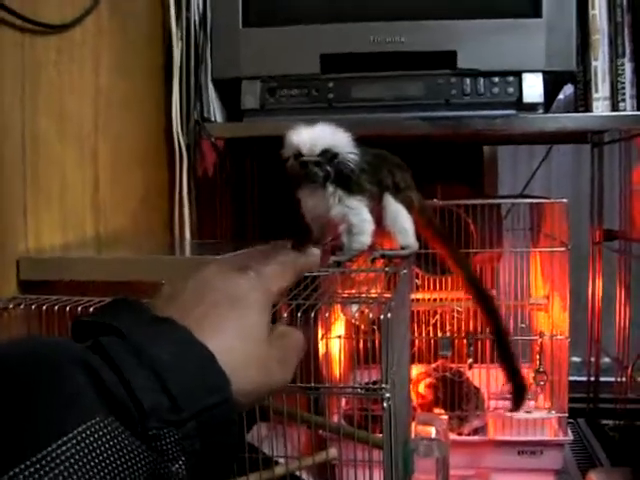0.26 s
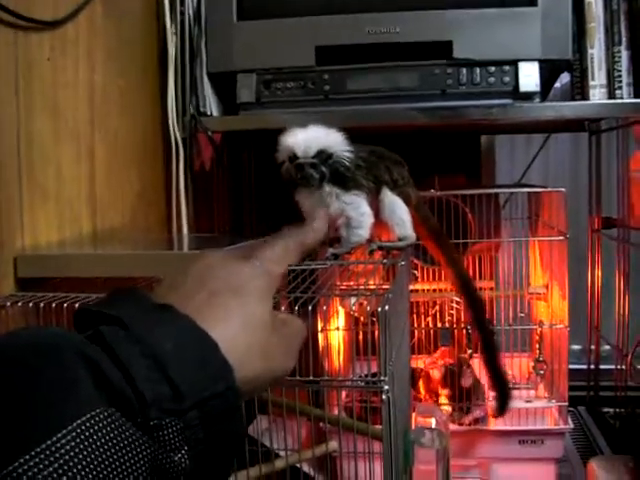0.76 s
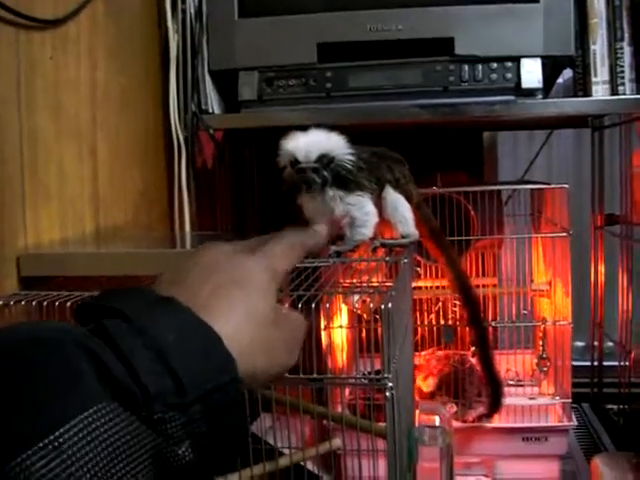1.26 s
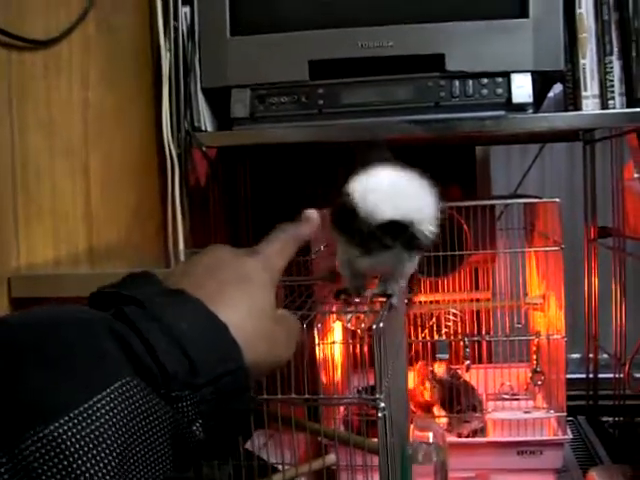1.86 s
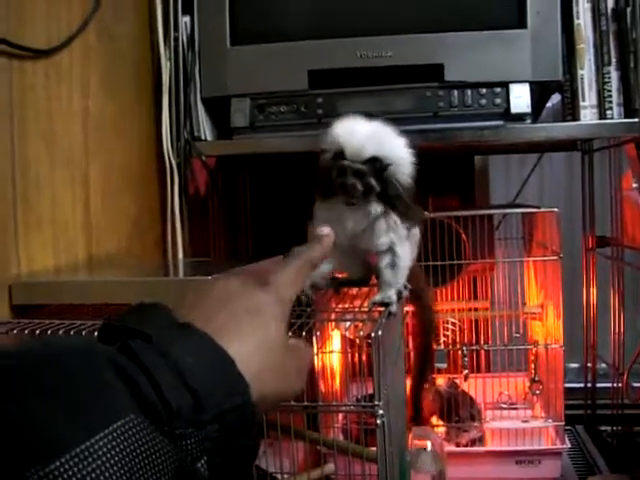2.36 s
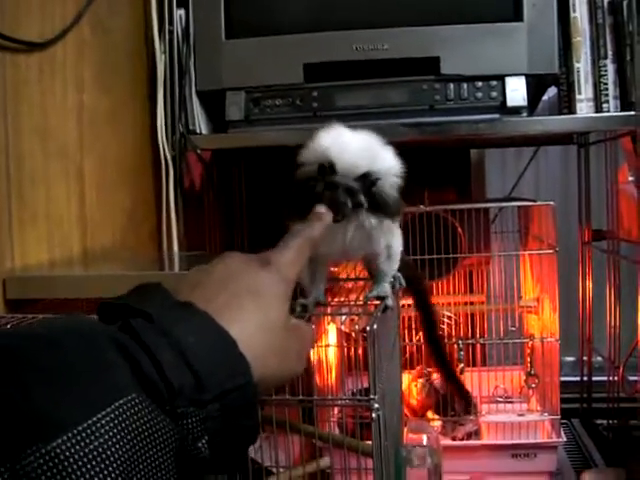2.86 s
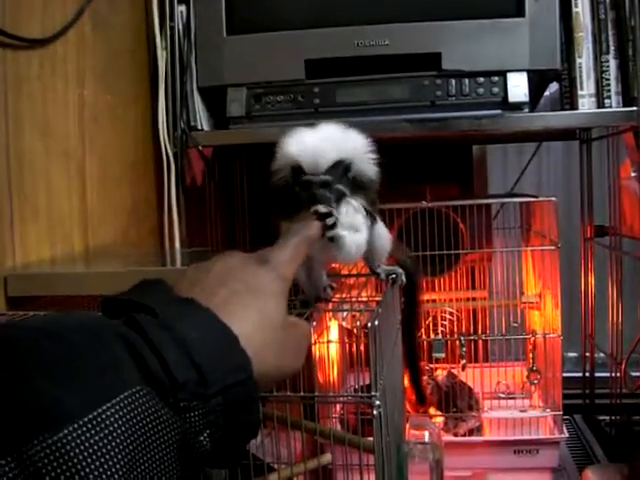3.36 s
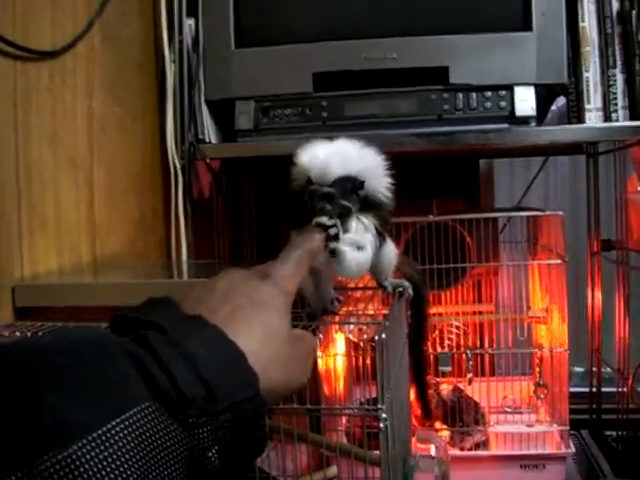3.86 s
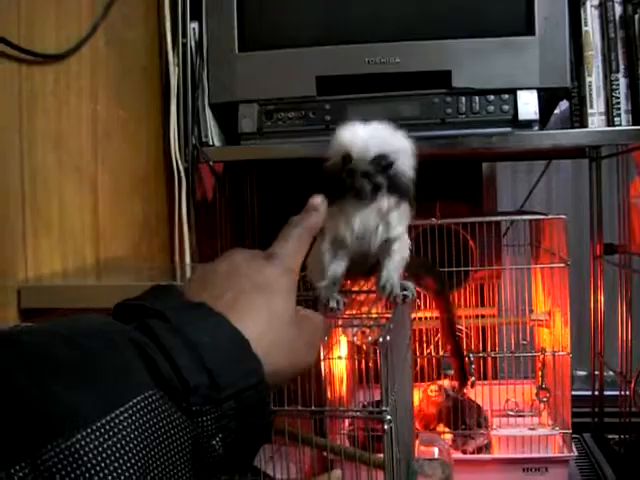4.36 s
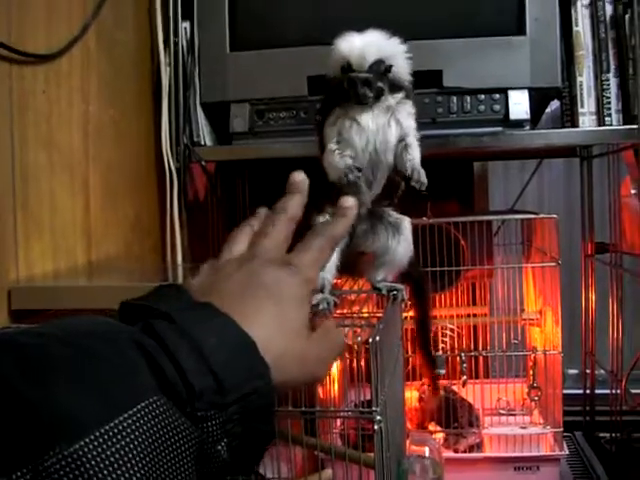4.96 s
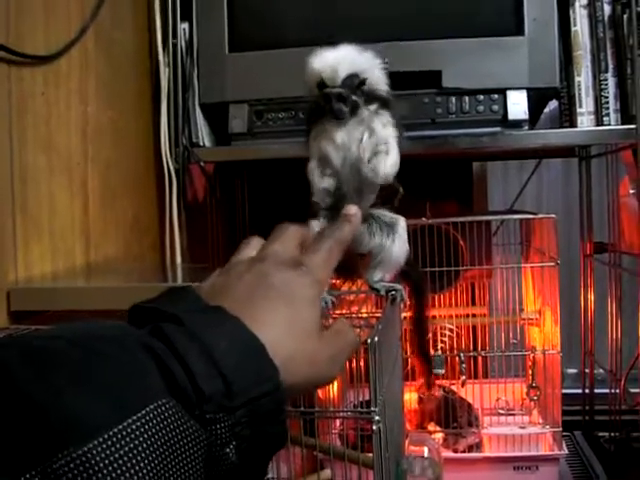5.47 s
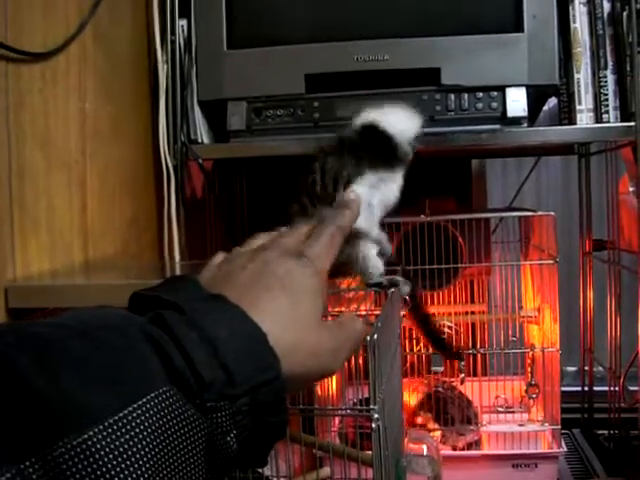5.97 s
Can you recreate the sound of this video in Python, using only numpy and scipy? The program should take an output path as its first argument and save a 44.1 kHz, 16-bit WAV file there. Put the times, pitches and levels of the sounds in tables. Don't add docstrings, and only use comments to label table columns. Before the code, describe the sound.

A small monkey whistles shrilly for a second, later gives five tiny falling chirps and one swooping whistle, over a low indoor motor hum.

```python
import sys
import numpy as np
from scipy import signal
from scipy.fft import rfft, irfft, next_fast_len
from scipy.io import wavfile
from scipy.ndimage import uniform_filter1d

SR = 44100
rng = np.random.default_rng(int(sys.argv[2]) if len(sys.argv) > 2 else 0)


def voltage_ratio(decibels):
    exponent = np.asarray(decibels, float) / 20
    return 10 ** exponent


def transcribe(u):
    v = np.clip(np.atleast_2d(u).T, -1, 1)
    q = np.round(v * 32767).astype(np.int16)
    wavfile.write(sys.argv[1], SR, q)


N = 273420

# hz, level_db (per Hz)
BREATH = [(1500, -4), (4000, -4.5), (7000, -6.5), (11000, -2.5), (16000, -2.5)]


def monkey():
    shared = coloured(BREATH)
    breath = shared + 1.4 * np.array([coloured(BREATH), coloured(BREATH)])
    return whistles(breath) + chirps(breath)


# start_s, pitch_hz, fundamental_db, overtones_db (against it), mouth_opening (0-1)
FALLING = [
    (0, 2206, -38, -0.5, 0.5),
    (0.029, 2085, -40, -3, 0.4),
    (0.06, 2040, -34, -13, 0.45),
    (0.08, 1991, -34.5, -10, 0.44),
    (0.093, 2125, -43, -11, 0.7),
]
LEVEL_ONE = [
    (0.162, 1485, -44, 6, 0.13),
    (0.18, 1668, -36.5, 3.5, 0.26),
    (0.204, 1692, -36, 4, 0.29),
    (0.246, 1648, -39, 2, 0.35),
    (0.31, 1683, -40, 5.5, 0.28),
    (0.362, 1689, -34.5, -2, 0.44),
    (0.429, 1750, -30.5, -6, 0.59),
    (0.48, 1753, -28.5, -8.5, 0.68),
    (0.517, 1733, -32.5, -2.5, 0.44),
]
LEVEL_TWO = [
    (0.619, 1418, -44.5, 8.5, 0.32),
    (0.641, 1610, -40, 12, 0.31),
    (0.662, 1695, -34.5, -1.5, 0.54),
    (0.723, 1720, -36, -3.5, 0.57),
    (0.738, 1722, -34, 2.5, 0.79),
    (0.814, 1741, -30, 1, 0.88),
    (0.885, 1760, -34, 4.5, 0.68),
    (0.96, 1781, -34.5, 11.5, 0.93),
    (1.047, 1818, -38.5, 8.5, 0.75),
]
SWOOPING = [
    (4.51, 4940, -37.5, 0, 1.34),
    (4.54, 5430, -35.5, 2, 1.16),
    (4.578, 3870, -45, 6, 1.27),
    (4.618, 2500, -40, -6, 0.75),
    (4.656, 2296, -43, -5.5, .7),
    (4.721, 2158, -33, -12, 0.61),
    (4.791, 2154, -30.5, -10.5, 0.65),
    (4.865, 2203, -38.5, -5, 0.69),
    (4.966, 2582, -37.5, -5, 0.83),
]
# partial3_db, partial5_db, partial6_db, partial7_db (against neighbours), breath_db
THROATS = [
    (-8, -1, -25, -14, -24),
    (-3.6, 0.5, -2, -17, -22),
    (-0.6, -1.5, -0.5, -19, -21.5),
    (-7, 8, 7, -4, -21),
]
# centre_hz, depth_db
SHADES = [
    (6800, 1),
    (6850, -1),
    (6950, -9),
    (6800, 3),
]


def whistles(breath):
    mouth_shut_hz, mouth_octaves = 3000, 1.74
    below_db_per_octave, above_db_per_octave = 11.5, 16
    pouch_hz, pouch_octaves, pouch_db = 3545, .045, -14
    duck_db, duck_s = -7.5, 0.0056
    break_db, break_s = 13.5, 0.00587
    head_turn_s, head_turn_share = 0.99, .78
    out = np.zeros((2, N))
    contours = [FALLING, LEVEL_ONE, LEVEL_TWO, SWOOPING]
    for rows, throat, (shade_hz, shade_db) in zip(contours, THROATS, SHADES):
        third_db, fifth_db, sixth_db, seventh_db, breath_db = throat
        s, *columns = np.transpose(rows)
        at = np.arange(round(s[0] * SR), round(s[-1] * SR))
        t = at / SR
        pitch, first, over_db, opening = [np.interp(t, s, column) for column in columns]

        away = np.log2(np.arange(2, 5)[:, None] * pitch / mouth_shut_hz) - mouth_octaves * opening
        resonance_db = np.minimum(below_db_per_octave * away, -above_db_per_octave * away)
        second, third, fourth = first + over_db + resonance_db
        ducking = sum(np.exp(-((t - slip_s) / duck_s) ** 2) for slip_s, _ in CRACKS)
        third = third + third_db + duck_db * ducking
        first = first + pouch_db * np.exp(-(np.log2(pitch / pouch_hz) / pouch_octaves) ** 2)
        second = second + pouch_db * np.exp(-(np.log2(2 * pitch / pouch_hz) / pouch_octaves) ** 2)
        second = second + break_db * np.exp((t - s[-1]) / break_s)

        middle = (third + fourth) / 2
        fifth = middle + fifth_db
        sixth = (middle + second) / 2 + sixth_db
        seventh = middle + seventh_db
        levels = [first, second, third, fourth, fifth, sixth, seventh, seventh - 9.5]
        turned = np.clip((t - head_turn_s) / 0.0388 + .5, 0, 1) * (s[0] < head_turn_s < s[-1])
        shade = shade_hz * head_turn_share ** turned
        out += voice(at, pitch, levels, shade, shade_db, breath, breath_db, sway=0.63)
    return out


# start_s, length_s, top_hz, knee_hz (before the closing dive), level_db
CHIRPS = [
    (3.048, 0.045, 10040, 8320, -33),
    (3.228, 0.033, 8530, 6140, -36),
    (3.631, 0.044, 10140, 8250, -32),
    (3.825, .059, 9400, 5300, -36.5),
    (4.024, 0.061, 6950, 4080, -35.5),
]
# bend (over 1 lingers at the top), dive (share of pitch lost), swell_db (start to end)
CHIRP_SHAPES = [
    (2.4, 0.38, 0),
    (1.24, 0.32, 0),
    (1.06, 0.32, -10),
    (0.71, 0.22, -15.5),
    (0.58, 0.092, 0.5),
]
# hz, gain_db
CHIRP_THROAT = [(4000, -3.5), (5300, -2), (6400, -5), (7500, -2), (9500, 3.5), (12500, 2.5), (16000, -4),
                (20000, -35)]


def chirps(breath):
    dive_time_s, dive_squeak_db = 0.0038, 23.5
    attack_s, soft_db = 0.0075, -4.5
    octave_db, twelfth_db = -11, -25
    out = np.zeros((2, N))
    for (start, length, top_hz, knee_hz, level_db), (bend, dive, swell_db) in zip(CHIRPS, CHIRP_SHAPES):
        at = np.arange(round(start * SR), round((start + length) * SR))
        t = (at - at[0]) / SR
        if bend > 1:
            sag = (t / length) ** bend
        else:
            sag = 1 - (1 - t / length) ** (1 / bend)
        lost = dive * np.exp((t - length) / dive_time_s)
        pitch = top_hz * (knee_hz / top_hz) ** sag * (1 - lost)

        envelope_db = level_db + soft_db * np.exp(-t / attack_s) + swell_db * (t / length - .5)
        weights_db = [0, octave_db + dive_squeak_db * (lost / 0.34) ** 2, twelfth_db]
        levels = [envelope_db + db + at_hz(CHIRP_THROAT, k * pitch) for k, db in enumerate(weights_db, 1)]
        out += voice(at, pitch, levels, pitch, 0, breath, breath_db=-15.0, sway=0.091)
    return out


# time_s, lost (share of pitch)
CRACKS = [
    (.089, 0.036),
    (0.514, 0.043),
    (0.7274, 0.03),
    (.35, .008),
    (.808, .008),
    (.928, 0.014),
    (1.002, 0.022),
    (1.044, 0.054),
    (4.787, 0.025),
    (4.958, 0.053),
]


def voice(at, pitch, levels, shade_hz, shade_db, breath, breath_db, sway):
    wobble, flicker_db = .003, 1.8
    beading_db, beading_per_s = 1.7, 55
    lean_db = 1.6
    grit_power = 1.26
    size = len(at)
    pitch = uniform_filter1d(pitch, size=120) * (1 + wobble * drift(45.2, size))
    slip = sum(share * np.exp(-((at / SR - s) / 0.0018) ** 2) for s, share in CRACKS)
    pitch = pitch * (1 - slip)
    turn = 2 * np.pi * np.cumsum(pitch) / SR
    sides = np.array([[.5], [-.5]])
    tones = 0
    for k, level_db in enumerate(levels, 1):
        hz = k * pitch
        loose = np.clip((hz - 2500) / 2500, .1, 1)
        shadow_db = shade_db * np.exp(-np.log(hz / shade_hz) ** 2 / 0.013)
        side_db = shadow_db + lean_db * loose * drift(16.2, size)
        lead = sway * loose * drift(12, size)
        fade_db = 4.0 * np.clip(hz / 1000 - 11.3, 0, None) * (k > 4)
        unsteady_db = flicker_db * drift(110, size) + beading_db * drift(beading_per_s, size)
        gain = np.sqrt(2) * voltage_ratio(level_db + loose * unsteady_db - fade_db) * (hz < .45 * SR)
        tones = tones + gain * voltage_ratio(sides * side_db) * np.sin(k * (turn + 0.93) + sides * lead)

    effort = np.sqrt(sum(voltage_ratio(db) ** 2 for db in levels[1:]) + 0.38 * voltage_ratio(levels[0]) ** 2)
    grit = voltage_ratio(breath_db + 100 * slip) * 0.018 * (effort / 0.021) ** grit_power
    since_start = at - at[0] + (at[0] == 0) * SR
    edge = np.clip(np.minimum(since_start, at[-1] - at) / (0.0025 * SR), 0, 1)
    out = np.zeros((2, N))
    out[:, at] = edge * (tones + grit * breath[:, at])
    return out


def cage():
    return rubs() + ticks()


# start_s, level_db, length_s, centre_hz, width_octaves
BRUSHES = [(1.302, -68.5, 0.31, 9000, 0.69), (1.504, -63.5, 0.14, 3000, 0.81),
           (1.687, -56, 0.059, 2010, 0.51), (1.54, -62.5, 0.094, 12000, 0.64),
           (1.686, -61.5, 0.06, 9600, 0.39), (1.692, -66, 0.071, 4860, .2),
           (1.766, -61, 0.029, 10000, 0.13), (1.764, -62.5, 0.035, 5100, 0.26),
           (1.926, -61, 0.045, 9500, 0.6), (2.328, -62, 0.058, 5200, 0.16),
           (2.367, -54.5, 0.052, 4900, 0.37), (2.458, -61.5, 0.077, 10500, .5),
           (2.486, -62.5, 0.055, 5030, 0.3), (2.835, -60.5, 0.049, 9000, 0.59),
           (4.28, -62, 0.025, 9000, .7)]
# start_s, level_db, length_s, centre_hz, width_octaves
SCRAPES = [
    (1.832, -51, 0.04, 12500, 1),
    (5.698, -62, 0.056, 10070, 0.77),
    (5.775, -56.5, 0.094, 8900, 1),
    (5.826, -67, .02, 9050, .6),
    (5.892, -68, 0.023, 9000, .3),
    (6.02, -64.5, 0.044, 9900, .5),
    (6.119, -61.5, 0.031, 10900, 1),
]
# hz, level_db, t60_s
BARS = [(4985, 5, 0.041), (6780, -1.5, 0.1), (9300, -15, 0.034), (8900, -5, 0.1), (10410, -5, 0.08),
        (13100, 3.5, 0.051), (15100, -8.5, .03)]


def rubs():
    fur_ring_db, claw_ring_db, pickup_db = -23, -5, -26.5
    grain_db = 5
    out = np.zeros((2, N))
    size = SR // 4
    t, hz = np.arange(size) / SR, np.fft.rfftfreq(size, 1 / SR)
    strokes = [(*row, fur_ring_db) for row in BRUSHES] + [(*row, claw_ring_db) for row in SCRAPES]
    for s, level_db, length, centre_hz, octaves, bars_db in strokes:
        grains = rng.standard_normal(size) * voltage_ratio(grain_db * rng.standard_normal(size))
        stroke = np.clip(t / (0.081 * length), 0, 1) * np.exp(-(t / length) ** 2)
        shape = np.exp(-.5 * (np.log2((hz + 1) / centre_hz) / octaves) ** 2)
        rub = rms_one(irfft(rfft(grains) * shape, size)) * stroke
        bars = 0
        for mode_hz, db, t60 in BARS:
            bars = bars + voltage_ratio(db + pickup_db + 1.8 * rng.standard_normal()) * ring(rub, mode_hz, t60)
        at = round(s * SR)
        out[:, at:at + size] += (voltage_ratio(level_db) * (rub + voltage_ratio(bars_db) * bars))[:N - at]
    return out


# start_s, peak_db, hz, t60_s
TICKS = [
    (1.692, -45, 990, 0.085),
    (1.697, -49.5, 1400, 0.083),
    (1.702, -56, 2300, .08),
    (1.84, -42, 327, 0.21),
    (1.838, -48.5, 1456, 0.073),
    (2.1083, -41, 5830, .003),
    (2.1083, -38.5, 2102, 0.0043),
    (2.1092, -40, 11900, .003),
    (2.1213, -41.5, 12030, .003),
    (2.3245, -41, 11200, 0.0019),
]


def ticks():
    out = np.zeros((2, N))
    for s, peak_db, hz, t60 in TICKS:
        click = np.zeros(N)
        click[round(s * SR)] = voltage_ratio(peak_db)
        out += ring(click, hz, t60)
    return out


# left_delay_s, right_delay_s, level_db
ECHOES = [(.0013, .0017, -11.5), (.0031, 0.0027, -13), (.0058, .0067, -18), (.0094, .0083, -19)]
# hz, t60_s
ROOM_T60 = [(1500, .26), (5500, .26), (9000, .25), (14000, .14)]
# hz, lead_rad
PORT_LEAD = [(20, 0), (2200, -.1), (4000, .35), (5500, .7), (8000, 1.5), (10500, 2.2), (16000, 2.7)]


def room(x):
    tail_db = -15
    size = next_fast_len(N + SR // 2)
    hz, t = np.fft.rfftfreq(size, 1 / SR), np.arange(SR // 2) / SR
    near = 1
    for left, right, db in ECHOES:
        near = near + voltage_ratio(db) * np.exp(-2j * np.pi * hz * np.array([[left], [right]]))

    white = rng.standard_normal((2, len(t)))
    edges = np.geomspace(200, 19000, num=8)
    tail = 0
    for low, high in zip(edges, edges[1:]):
        band = signal.sosfilt(signal.butter(2, (low, high), "band", fs=SR, output="sos"), white)
        tail = tail + band * voltage_ratio(-60 * t / at_hz(ROOM_T60, 2.7 * low))
    tail *= np.clip(t / 0.018, 0, 1)
    tail *= voltage_ratio(tail_db) / np.sqrt(np.sum(tail ** 2, axis=1, keepdims=True))

    lead = np.exp(.5j * at_hz(PORT_LEAD, hz) * [[1], [-1]])
    paths = near * lead + rfft(tail, size)
    common = paths.mean(axis=0)
    paths = common + (paths - common) * np.clip(hz / 4500, 0, 1) ** 2
    return irfft(rfft(x, size) * paths, size)[:, :N]


# hz, level_db (rms), width_hz
HUM = [(31.7, -57, 6.04), (99.4, -54, 2.7), (197, -57.5, 5), (290.5, -63.5, 5.2), (394.5, -61, 5.95),
       (410.3, -62.5, 31.1), (486.2, -64, 5), (596.6, -69.5, 6.53), (682, -67, 6.71), (1897, -73, 60)]


def motor():
    t, out = np.arange(N) / SR, 0
    for hz, level_db, width_hz in HUM:
        wander = 2 * np.pi * width_hz * np.cumsum(drift(8, N)) / SR / 4
        phase = 2 * np.pi * hz * t + wander + rng.uniform(0, 6.52)
        out = out + np.sqrt(2) * voltage_ratio(level_db + 2.0 * drift(7, N)) * np.sin(phase)
    return out


def screen():
    scan_hz, left_db, right_db = 15732, -80, -77
    tone = np.sin(2 * np.pi * scan_hz * np.arange(N) / SR)
    return voltage_ratio(np.array([[left_db], [right_db]])) * tone * [[1.4], [-1.4]]


# hz, level_db (per Hz)
AIR_MID = [(12, -32), (22, 0), (45, -4), (80, -7), (170, -6.5), (400, -13.5), (900, -15.5), (1200, -21.5),
           (1720, -22.5), (1900, -19.5), (2100, -25), (5500, -36.5), (9000, -44), (16000, -50)]
# hz, level_db (per Hz)
AIR_SIDE = [(12, -24.5), (22, 0), (60, -5.5), (250, -9), (800, -14), (1200, -16), (2000, -16.5),
            (5000, -19.5), (10000, -24), (16000, -29.5)]
# time_s, lift_db, spread_s
SLEEVE = [
    (0, 3.5, 0.64),
    (1.5, 6, .14),
    (1.76, 2, 0.13),
]


def background():
    mid = voltage_ratio(-49.5) * coloured(AIR_MID) + motor()
    side = voltage_ratio(-57) * coloured(AIR_SIDE)
    bright = signal.sosfilt(signal.butter(2, 5000, "high", fs=SR, output="sos"), side)
    t = np.arange(N) / SR
    lift_db = sum(db * np.exp(-((t - s) / spread) ** 2) for s, db, spread in SLEEVE)
    side = side + (voltage_ratio(lift_db) - 1) * bright
    return screen() + mid * voltage_ratio(np.array([[-.8], [.8]])) + side * [[1], [-1]]


def rms_one(x):
    return x / np.sqrt(np.mean(x ** 2) + 1e-20)


def at_hz(points, hz):
    table_hz, values = np.transpose(points)
    return np.interp(np.log(np.maximum(hz, 1)), np.log(table_hz), values)


def coloured(spectrum):
    hz = np.fft.rfftfreq(N, 1 / SR)
    return rms_one(irfft(rfft(rng.standard_normal(N)) * voltage_ratio(at_hz(spectrum, hz)), N))


def drift(rate, size):
    knots = rng.standard_normal(2 + size // 100)
    return np.interp(np.arange(size) * rate / SR, np.arange(len(knots)), knots)


def ring(x, hz, t60):
    r, w = voltage_ratio(-60 / (t60 * SR)), 2 * np.pi * hz / SR
    return signal.lfilter([0, np.sin(w)], [1, -2 * r * np.cos(w), r * r], x + 1e-18)


def scene():
    return room((monkey() + cage()) * voltage_ratio(np.array([[-1.3], [1.3]]))) + background()


def roll_off(x):
    return signal.sosfilt(signal.butter(12, 16810, fs=SR, output="sos"), x)


def record(dry):
    low_pass = signal.ellip(12, .5, 70, 15900 - 130, fs=SR, output="sos")
    mix = signal.sosfilt(low_pass, dry)
    return roll_off(mix)


dry = scene()
out = record(dry)
transcribe(out)
```